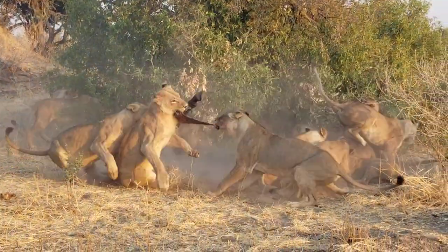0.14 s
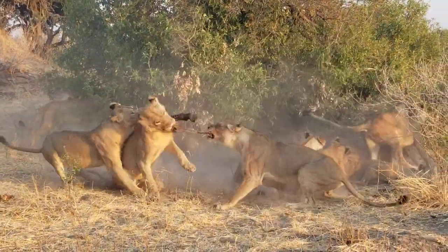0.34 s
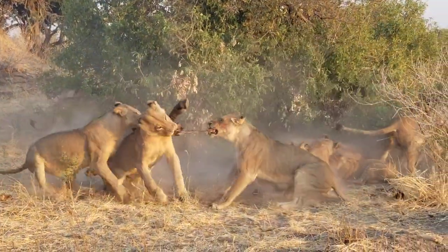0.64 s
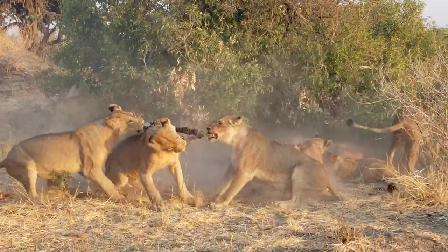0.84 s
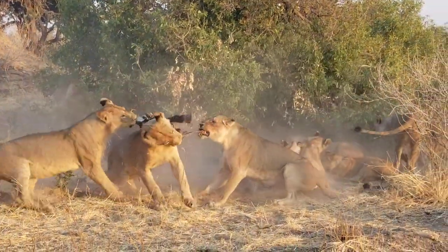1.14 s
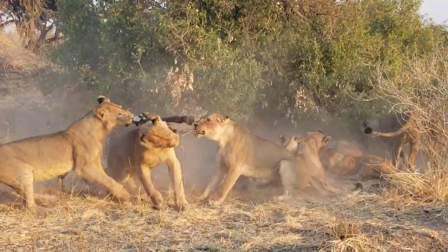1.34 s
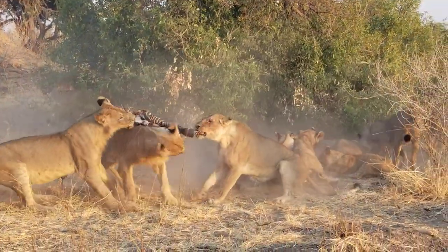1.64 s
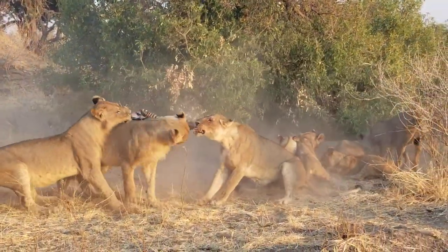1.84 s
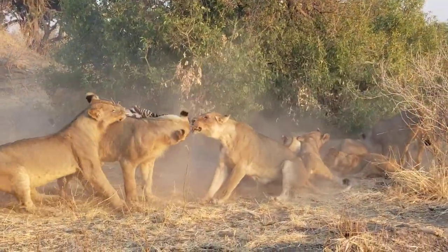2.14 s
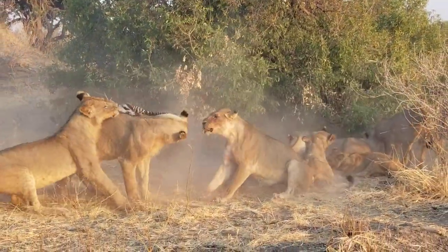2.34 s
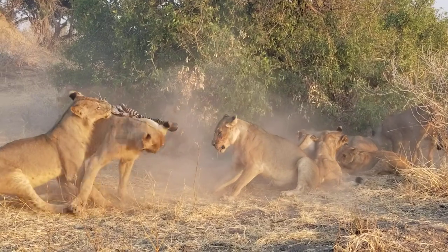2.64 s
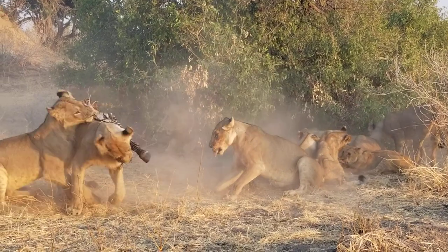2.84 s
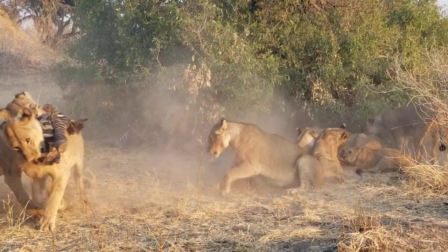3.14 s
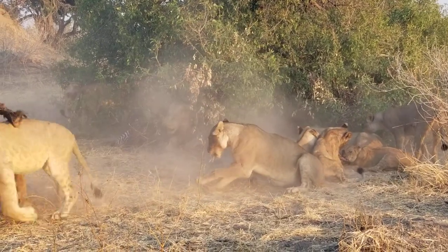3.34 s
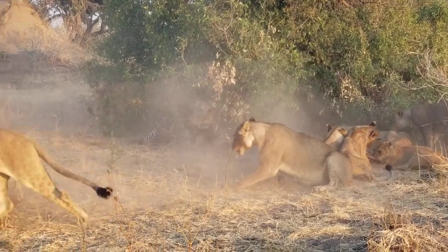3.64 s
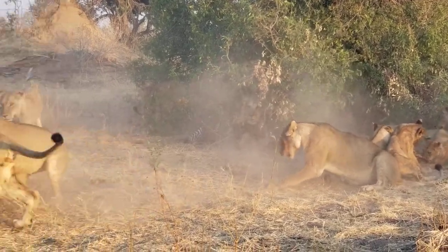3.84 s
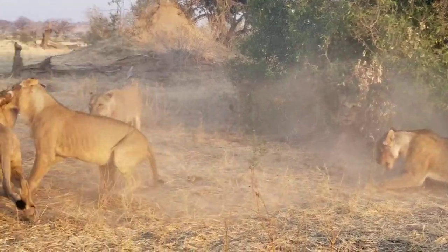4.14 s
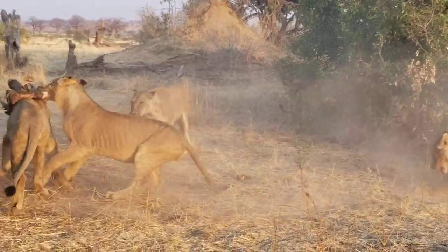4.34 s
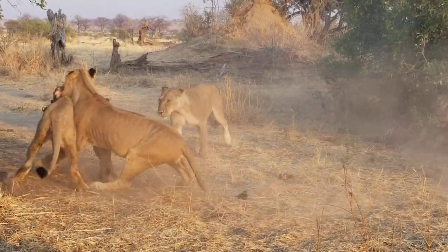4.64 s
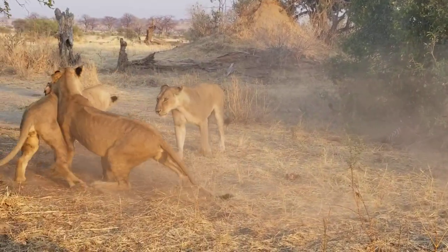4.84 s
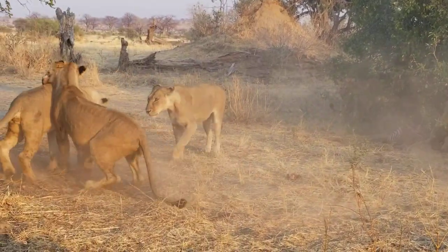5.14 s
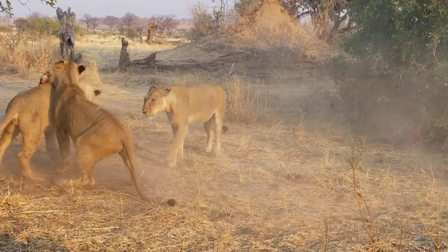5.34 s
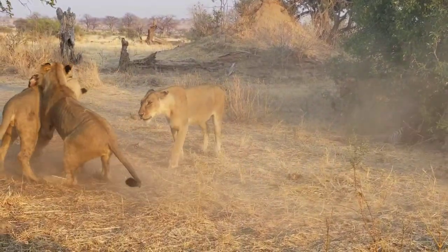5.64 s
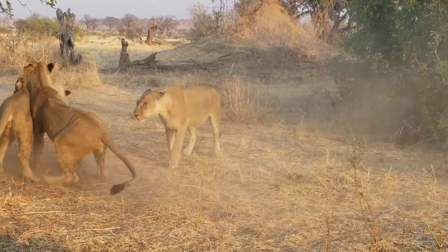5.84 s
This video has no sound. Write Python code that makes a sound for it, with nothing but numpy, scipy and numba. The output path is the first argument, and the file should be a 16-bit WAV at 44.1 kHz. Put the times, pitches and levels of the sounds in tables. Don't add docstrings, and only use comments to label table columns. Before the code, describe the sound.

Lions growl and snarl in deep, rattling pulses over a kill, with dry grass rustling and camera shutters clicking close by.

```python
import sys
import numpy as np
from scipy import signal
from scipy.fft import next_fast_len
from scipy.io import wavfile
from scipy.ndimage import uniform_filter1d
from numba import njit

SR = 44100
rng = np.random.default_rng(int(sys.argv[2]) if len(sys.argv) > 2 else 0)


def dump_mix(stems):
    frames = np.atleast_2d(stems).T
    limited = np.clip(frames, -1, 1)
    pcm = np.round(limited * 32767).astype(np.int16)
    wavfile.write(sys.argv[1], SR, pcm)


def invert_db(level):
    return 10 ** (np.asarray(level, dtype=float) / 20)


N = 264159


def rms_one(x):
    return x / np.sqrt(np.mean(x ** 2) + 1e-20)


def in_time(rows):
    s, *columns = np.transpose(rows)
    return [np.interp(np.arange(N) / SR, s, c) for c in columns]


def at_hz(points, hz):
    points_hz, db = np.transpose(points)
    return np.interp(np.log(hz), np.log(points_hz), db)


def drift(rate_hz):
    r = np.exp(-80 * np.pi * rate_hz / SR)
    white = rng.standard_normal(N // 40 + 2002)
    slow = signal.lfilter([1], [1, -2 * r, r * r], white)[2000:]
    return np.interp(np.arange(N) / 40, np.arange(len(slow)), rms_one(slow))


def cut(x, hz, kind, order=2):
    return signal.sosfilt(signal.butter(order, hz, kind, fs=SR, output="sos"), x)


def steep_low(x, edge_hz):
    return signal.sosfilt(signal.cheby2(12, 60, edge_hz, fs=SR, output="sos"), x)


def fade(x, seconds):
    decay = np.exp(-1 / (max(seconds, 1e-4) * SR))
    return signal.lfilter([1], [1, -decay], x + 1e-18)


def early(x, seconds):
    return np.interp(np.arange(N) + seconds * SR, np.arange(N), x)


@njit
def resonate(x, turn, r):
    y = np.zeros(len(x))
    for i in range(2, len(x)):
        drive = (1 - r[i] ** 2) / 2 * (x[i] - x[i - 2])
        y[i] = drive + 2 * r[i] * np.cos(turn[i]) * y[i - 1] - r[i] ** 2 * y[i - 2]
    return y


def cavities(x, modes, sign=-1):
    out = 0
    for k, (hz, width_hz, db) in enumerate(modes):
        turn = 2 * np.pi * hz / SR * np.ones(N)
        radius = np.exp(-np.pi * width_hz / SR) * np.ones(N)
        out = out + sign ** k * invert_db(db) * resonate(x, turn, radius)
    return out


def evened(x, seconds=0.12):
    size = int(seconds * SR)
    power = uniform_filter1d(uniform_filter1d(x ** 2, size=size), size=size // 2)
    return x / np.sqrt(power + 1e-12)


ATTACK_DB_PER_S, RELEASE_DB_PER_S = 305, 241


def swells(start, end, first_db, last_db, *traits, floor_db, rise=ATTACK_DB_PER_S, fall=RELEASE_DB_PER_S):
    t = np.arange(0, N + 128, 128)[:, None] / SR
    progress = np.clip((t - start) / np.maximum(end - start, 1e-3), 0, 1)
    hold_db = first_db + (last_db - first_db) * progress
    skirts_db = rise * np.maximum(start - t, 0) + fall * np.maximum(t - end, 0)
    power = invert_db(hold_db - skirts_db) ** 2 + 1e-200
    total = power.sum(axis=1)
    level_db = 10 * np.log10(total + invert_db(floor_db) ** 2)
    return in_time(np.transpose([t[:, 0], level_db] + [power @ c / total for c in traits]))


PORTS_SHARE = .5


def ports(pair, share=PORTS_SHARE):
    turned = np.imag(signal.hilbert(pair[0], next_fast_len(N)))[:N]
    share = np.clip(share, 0, 1)
    return np.array([pair[0], share * turned + np.sqrt(1 - share ** 2) * pair[1]])


# frequency in Hz, side against mid in dB.
WIDTH = [(60, 36), (110, 17), (200, 16), (380, 11), (700, -3), (1290, 2), (2380, -2), (4400, 1.5),
         (8120, -0.5), (15000, 1)]


def banded_noise(spectrum, patchy_db):
    out, together = 0, drift(25)
    edges = 30 * 2 ** np.arange(0, 9.6, .5)
    white = [ports(pair) for pair in rng.standard_normal((2, 2, N))]
    for k, (low, high) in enumerate(zip(edges, edges[1:])):
        hz = np.sqrt(low * high)
        if high > spectrum[0][0] and low < spectrum[-1][0]:
            mid, side = cut(white[k % 2], [low, high], "band")
            gain = invert_db(at_hz(spectrum, hz) + patchy_db * (1.1 * together + drift(27.0)))
            out = out + gain * (mid + invert_db(at_hz(WIDTH, hz)) * side * [[1], [-1]])
    return rms_one(out)


def panned(events):
    clicks = np.zeros((2, N))
    for s, peak_db, pan_db, *rest in events:
        clicks[:, int(s * SR)] = invert_db(peak_db + np.array([pan_db, -pan_db]) / 2)
    return clicks


# start in seconds, end in seconds, pulses per second at start,
# pulses per second at end, roughness 0-1.
PHRASES = [(.005, .17, 45, 50, .6), (.19, .32, 36, 40, .6), (.324, .51, 36, 31, .3),
           (.52, .64, 39, 35.5, .2), (.655, .83, 32, 33.5, .12), (.836, 1.09, 36.5, 31, .13),
           (1.113, 1.35, 27, 30, .25), (1.38, 1.76, 32, 30, .6), (1.772, 2.1, 21.3, 23, .15),
           (2.17, 2.3, 30, 30, .7), (2.316, 2.5, 32, 32, .4), (2.522, 2.94, 25.5, 17.5, .17),
           (3.012, 3.19, 32, 35, .2), (3.21, 3.32, 40, 40, .7), (3.328, 3.46, 45, 46, .13),
           (3.475, 3.6, 44, 44, .5), (3.607, 3.88, 33, 34, .15), (3.895, 4.26, 32, 30.5, .15),
           (4.271, 4.68, 21, 15, .65), (4.702, 4.88, 46, 28, .3), (4.891, 5.24, 31, 30, .4),
           (5.26, 5.54, 30, 30, .7), (5.552, 5.75, 32, 32, .4), (5.772, 5.99, 31, 34, .2)]
LIMPING_PHRASE_S, LIMP_DB = 1.113, 8.5


def folds(slip_s=.005, spread_db=6.0):
    pulses, rough = np.zeros(N), np.zeros(N)
    for start, end, first, last, roughness in PHRASES:
        chance, s = rng.standard_normal((30, 2)), start
        rough[int(start * SR):] = np.clip(roughness, 0, 1)
        for k, (slip, size) in enumerate(chance):
            if s < end:
                at = int((s + slip * slip_s * roughness * (k > 0)) * SR)
                limp_db = LIMP_DB * (start == LIMPING_PHRASE_S and k % 2 == 0)
                pulses[min(at, N - 1)] = invert_db(spread_db * roughness * size - limp_db)
            s += 1 / np.interp(s, [start, end], [first, last])
    return pulses, rough


def voiced(pulses, rough, puff_s, turbulence=1):
    puffs = rms_one(fade(np.abs(pulses), puff_s) * rng.standard_normal(N))
    return (1 - rough) * rms_one(pulses) + turbulence * rough * puffs


SLOW_PER_S, FAST_PER_S, FAST_DAMPING = 29, 33, 1.6
LIMP_RING = .65


def damping():
    start, end, first, last, rough = np.transpose(PHRASES)
    running = np.clip(np.searchsorted(start * SR, np.arange(N)) - 1, 0, None)
    factor = np.interp((first + last) / 2, [SLOW_PER_S, FAST_PER_S], [1, FAST_DAMPING])
    return np.where(start == LIMPING_PHRASE_S, LIMP_RING, factor)[running]


# full from seconds, held until seconds, chest level at start in dB,
# at end in dB, raised larynx as low throat against chest in dB.
RUMBLES = [(0, 0.12, -25, -42, -2), (0.235, 0.356, -35.5, -45, 2.5), (0.38, 0.493, -30.5, -26.5, 0),
           (0.52, 0.727, -28.5, -27, 0), (0.766, 1.068, -33.5, -34, -2.5), (1.113, 1.34, -25.5, -31, -6.5),
           (1.413, 1.642, -43.5, -48, 3), (1.791, 2.03, -35.5, -33, -14.5), (2.17, 2.24, -61, -43.5, -6.5),
           (2.327, 2.44, -29.5, -40, -7.5), (2.503, 2.742, -31, -34, -4), (2.8, 2.887, -39.5, -44.5, 3.5),
           (3.029, 3.07, -38.5, -37, 5.5), (3.107, 3.162, -42, -47.5, 2), (3.387, 3.458, -30.5, -30.5, 3),
           (3.47, 3.571, -41, -30, -0.5), (3.595, 3.931, -26, -32.5, -1.5), (3.958, 4.03, -43, -44.5, 18),
           (4.023, 4.169, -34, -33.5, -2), (4.243, 4.575, -40.5, -53.5, -1.5),
           (4.746, 4.784, -33.5, -28, -3), (4.823, 5.177, -35.5, -42.5, -4), (5.38, 5.5, -48.5, -63, 1.5),
           (5.584, 5.647, -41, -44, -3.5), (5.789, 5.987, -33.5, -38, -8.5)]
# full from seconds, held until seconds, throat level in dB, throat ring in Hz,
# jaw opening 0-1.
SNARLS = [(0, 0.093, -36, 303, 0.41), (0.17, 0.257, -58, 312, 0.56), (0.314, 0.39, -49.5, 296, 0.6),
          (0.399, 0.466, -37.5, 452, 0.52), (0.515, 0.615, -42.5, 444, 0.8), (0.605, 0.628, -35, 335, 0.64),
          (0.654, 0.685, -40, 388, 0.54), (0.693, 0.774, -34, 363, 0.33), (0.82, 0.962, -37, 403, 0.24),
          (0.96, 1.085, -41, 380, 0.39), (1.105, 1.135, -35.5, 384, 0.47),
          (1.159, 1.188, -28.5, 425.6, 0.33), (1.202, 1.275, -31.5, 412, 0.25),
          (1.301, 1.339, -32.5, 399, 0.26), (1.412, 1.8, -49.5, 318, 0.1), (1.834, 1.9, -55.5, 410, 0),
          (1.97, 2.041, -44, 345, 0.3), (2.294, 2.405, -50, 505, 0.59), (2.44, 2.502, -51, 474, 0.47),
          (2.52, 2.567, -49, 362, 0.4), (2.603, 2.708, -46.5, 351, 0.3), (2.718, 2.796, -44, 326, 0.21),
          (2.797, 2.848, -46.5, 360, 0.23), (2.886, 2.9, -58, 292, 0.2), (3.015, 3.045, -54.5, 303, 0),
          (3.04, 3.09, -51.5, 298, 0.39), (3.092, 3.205, -52, 310, 0.25), (3.36, 3.398, -47.5, 322, 0.54),
          (3.402, 3.444, -44, 515, 0.55), (3.458, 3.57, -46, 362, 0.42), (3.613, 3.636, -36.5, 416, 0.43),
          (3.714, 3.79, -41.5, 393, 0.35), (3.85, 3.862, -51, 392, 0.6), (3.916, 3.988, -44, 318, 0.22),
          (4.025, 4.237, -45.5, 360, 0.43), (4.36, 4.71, -53, 293, 0.44), (4.729, 4.895, -45.5, 296, 0.45),
          (4.916, 5.19, -48.5, 256, 0.4), (5.37, 5.562, -62, 398, 0.48), (5.573, 5.666, -54, 512, 0.2),
          (5.78, 5.906, -53.5, 324, 0.42), (5.95, 5.99, -50, 320, 0.37)]
# time in seconds, mouth ring in Hz.
LIPS = [(0, 820), (.32, 910), (.4, 902), (.45, 850), (.62, 854), (.75, 870), (1.03, 830), (1.16, 760),
        (1.3, 774), (2.05, 810), (2.33, 930), (2.6, 906), (3.4, 940), (3.6, 953), (3.85, 890), (4.05, 673),
        (4.76, 918), (5.99, 830)]
# time in seconds, share of the ring behind the teeth in dB.
TONGUE = [(.1, -12), (.4, -14.5), (.5, -3.5), (1.0, -29), (1.1, -10), (2.1, -30), (2.3, 1), (2.55, 1),
          (3.05, -51), (3.44, -2), (3.75, -25), (4.2, -1), (4.3, -11), (4.6, -10), (4.9, 4), (5.2, -16)]
SNARL_ATTACK_DB_PER_S, SNARL_RELEASE_DB_PER_S, SNARL_SAG_DB_PER_S = 487, 361, 37.5
FAR_RUMBLE_DB, FAR_SNARL_DB = -67, -80.5
MOUTH_SHUT_DB, MOUTH_OPEN_DB = -32, 18
WANDER = .018


def posture():
    chest_db, low_db = swells(*np.transpose(RUMBLES), floor_db=FAR_RUMBLE_DB)
    start, end, db, hz, jaw = np.transpose(SNARLS)
    sagged_db = db - SNARL_SAG_DB_PER_S * (end - start)
    snarl_db, throat_hz, jaw = swells(start, end, db, sagged_db, hz, jaw, floor_db=FAR_SNARL_DB,
                                      rise=SNARL_ATTACK_DB_PER_S, fall=SNARL_RELEASE_DB_PER_S)
    throat_db = snarl_db - chest_db
    mouth_db = throat_db + MOUTH_SHUT_DB + (MOUTH_OPEN_DB - MOUTH_SHUT_DB) * jaw
    mouth_hz = in_time(LIPS)[0] * (1 + WANDER / 2 * drift(7.6))
    throat_hz = throat_hz * (1 + WANDER * drift(13.8))
    return chest_db, low_db, throat_db, mouth_db, throat_hz, mouth_hz, in_time(TONGUE)[0]


# centre in Hz, width in Hz, level in dB.
CHEST = [
    (56, 15, 1),
    (97, 14, 2),
]
# centre in Hz, width in Hz, level in dB.
LOW_THROAT = [(153.7, 28.9, 4.5), (167.9, 29.7, 5), (185.6, 12.1, 2), (225, 125, -16)]
# time in seconds, centre of the low throat rings in Hz.
LARYNX = [(0, 149.6), (.5, 153.5), (1.1, 155), (1.42, 176), (1.72, 179), (1.8, 154), (2.3, 155), (2.8, 157),
          (3.04, 176.4), (3.35, 163), (3.6, 161), (3.88, 158), (3.96, 177), (4.22, 180.3), (4.55, 178),
          (4.8, 149), (5.2, 160.4), (5.99, 150.4)]
# time in seconds, share of their ring in dB.
CHEEKS = [(.05, -4.5), (.4, -12.5), (.64, -15), (.7, -6.5), (.82, -12), (1.0, -14.5), (1.15, -37),
          (1.4, -5.5), (2.1, -49), (2.3, -5), (2.55, -16), (3.05, -46), (3.44, -9), (3.75, -16),
          (3.95, -18), (4.3, -8), (4.9, -4), (5.2, -24)]
# time in seconds, firmness 0-1.
FIRMNESS = [(0, 0.71), (.45, 0.58), (.63, 0.56), (1.0, 0.33), (1.12, 0.27), (1.4, 0.11), (1.8, 0.2),
            (2.3, 0.47), (2.9, 0.49), (3.2, 0.38), (3.55, 0), (3.62, 0.88), (3.9, 0.86), (4.12, 0.86),
            (4.3, 0.52), (4.8, 0.22), (5.3, 0.38), (5.99, 0.46)]
# full from seconds, held until seconds, extra deepest ring in dB.
HEAVY_CAT = [
    (0.757, 1.026, 17),
    (1.72, 1.825, 0),
    (2.3, 2.41, 6),
]
LARYNX_REST_HZ = 170
CHEST_LEAD_S, THROAT_LEAD_S = 0.00835, 0.004233
THUMP_HZ, THUMP_WIDTH_HZ, THUMP_DB, THUMP_LEAD_S = 151.2, 75.9, 1.5, .0015
FIRM_DAMPING, FIRM_CLEARS, FIRM_NECK_DB = 1.67, 0.33, -9.5
BELLY_FOLLOWS = 0.22


def growl(pulses, rough):
    chest_db, low_db, throat_db, mouth_db, throat_hz, mouth_hz, ring_db = posture()
    firm = np.clip(in_time(FIRMNESS)[0], 0, 1)
    damped = 1 + FIRM_DAMPING * firm
    clearing = np.clip(1 - FIRM_CLEARS * firm, 0, 1)
    leak = rough * clearing

    belly, ribs = CHEST
    start, end, extra_db = np.transpose(HEAVY_CAT)
    heavy_db, = swells(start, end, extra_db, extra_db, floor_db=0)
    body = [(belly[0], belly[1] * damped, belly[2] + BELLY_FOLLOWS * low_db + heavy_db),
            (ribs[0], ribs[1] * damped, ribs[2])]
    chest = cut(cavities(voiced(-pulses, leak, .025, 1.8), body, sign=1), [45, 125], "band")

    thump_mode = [(THUMP_HZ, THUMP_WIDTH_HZ, 0)]
    thump = cavities(cavities(pulses, thump_mode), thump_mode)

    lift = in_time(LARYNX)[0] / LARYNX_REST_HZ
    low_modes = [(hz * lift, width_hz * damped, db) for hz, width_hz, db in LOW_THROAT]
    low = cut(cavities(voiced(pulses, leak, .018, 1.1), low_modes), [128, 260], "band")

    wide = damping()
    tube = voiced(pulses, leak, 0.011) / np.sqrt(wide)
    for width_hz in (32, 120, 170):
        tube = cavities(tube, [(throat_hz, width_hz * wide, 0)])
    muffled = np.clip(rough - (mouth_db + 14) / 24, rough, .9) * clearing
    neck_modes = [(302.5, 32.3 * damped, -0.5 + FIRM_NECK_DB * firm), (544, 224, in_time(CHEEKS)[0])]
    neck = cut(cavities(voiced(pulses, muffled, 0.089), neck_modes), [250, 680], "band")
    throat = tube + neck

    mouth_modes = [(mouth_hz * 0.802, 60, -3), (mouth_hz, 60, 0), (1060, 200, -22), (1210, 35, ring_db)]
    mouth = cut(cavities(voiced(pulses, muffled, 0.03), mouth_modes), [560, 1400], "band")

    mix = early(evened(chest), CHEST_LEAD_S)
    mix = mix + firm * invert_db(THUMP_DB) * early(evened(thump), THUMP_LEAD_S)
    mix = mix + invert_db(low_db) * early(evened(low), THROAT_LEAD_S)
    mix = mix + invert_db(throat_db) * early(evened(throat), THROAT_LEAD_S)
    mix = mix + invert_db(mouth_db) * evened(mouth)
    return invert_db(chest_db) * mix


# full from seconds, held until seconds, level at start in dB, at end in dB,
# bared teeth as bright against dull part in dB.
HISSES = [(0, 0.182, -54.5, -54, 1), (0.213, 0.46, -62.5, -54, 0.5), (0.494, 0.649, -52.5, -53, 3),
          (0.678, 1.03, -50, -56, -9), (1.128, 1.337, -55.5, -57, 3), (1.41, 1.683, -62.5, -69, -6),
          (1.997, 2.075, -57, -66, -1), (2.302, 2.668, -56, -55, -3), (2.801, 2.86, -54.5, -62, -13),
          (3.058, 3.157, -63, -67.5, -17), (3.29, 3.424, -61, -56, -14), (3.43, 3.466, -44.5, -46, -1),
          (3.503, 3.54, -51, -49, -6), (3.54, 4.21, -51.5, -63, -12.5), (4.27, 4.283, -52, -59, -12),
          (4.354, 4.7, -60.5, -74, -10), (4.753, 4.9, -52, -46, -29), (4.969, 5.1, -51.5, -79, -15),
          (5.825, 5.88, -45.5, -59, -16), (5.903, 5.99, -61, -60, -6)]
# time in seconds, share.
STEADY_BREATH = [(0, .1), (.35, .03), (.7, 0.041), (1.0, 0.3), (1.4, 0.054), (2.2, 0.075), (2.3, 0.76),
                 (2.55, 0.85), (2.62, 0.055), (3.3, 0.07), (3.55, .08), (3.7, 0.025), (4.7, .05),
                 (4.8, 0.15), (5.7, .1), (5.8, 0.55), (5.99, .6)]
# centre in Hz, width in Hz, level in dB.
TEETH = [(2532, 26, 7), (2803, 150, 7), (3146, 174, 6), (3650, 400, 1)]
# centre in Hz, width in Hz, level in dB.
PALATE = [(1046, 153, 7.5), (1365, 155, 6.5), (1607, 67, 8), (1943, 250, 2.5), (2445, 130, 1.5),
          (3240, 105, -3.5)]
FAR_HISS_DB = -106


def rasp(pulses, rough):
    dull_db, bared_db = swells(*np.transpose(HISSES), floor_db=FAR_HISS_DB, rise=SNARL_ATTACK_DB_PER_S)
    bright_db = dull_db + bared_db
    steady = np.clip(in_time(STEADY_BREATH)[0], 0, 2)
    throb = .04 + 2 * rough ** 2 + fade(pulses, .014) + steady
    spurt = .05 + rough ** 2 * 1.3 + fade(pulses, .01) + steady
    sides = []
    for air in ports(rng.standard_normal((2, N)), share=PORTS_SHARE + 0.11):
        bright = cut(cavities(spurt * air, TEETH), [2100, 4300], "band")
        dull = cut(cavities(throb * air, PALATE), 3500, "low", order=4)
        sides.append(invert_db(bright_db) * evened(bright) + invert_db(dull_db) * evened(dull))
    mid, side = sides
    flutter_db = 1.5 * drift(9.5)
    return invert_db(-5.5 + flutter_db) * (mid + invert_db(-1.0) * side * [[1], [-1]])


# delay in seconds, left level in dB, right level in dB.
ECHOES = [
    (.0042, -50, -40.5),
    (0.009, -31, -12),
    (.047, -13.5, -13.5),
    (.083, -21, -29),
]


def outdoors(x):
    out, dull = x * invert_db([[.7], [-.7]]), cut(x, 3300, "low")
    for s, left_db, right_db in ECHOES:
        lag = int(s * SR)
        out[:, lag:] += invert_db([[left_db], [right_db]]) * dull[:-lag]
    return out


# frequency in Hz, density in dB.
BUSH = [(18, -31), (30, 0), (138, 2), (582, 13.5), (1130, 9), (1660, 7), (1820, -39), (2400, -52),
        (3300, -6.5), (7000, 8.5), (9100, -17), (15400, -120)]


def bush():
    return invert_db(-61) * banded_noise(BUSH, patchy_db=3)


# time in seconds, level in dB.
SCUFFLE = [(0, -50.5), (.3, -46), (.95, -45.5), (1.05, -56), (1.55, -54), (2.1, -51.5), (3.9, -53),
           (4.3, -50), (4.65, -51), (4.8, -53.5), (5.35, -55), (5.99, -58)]
# time in seconds, peak in dB.
SWEEPS = [(0.096, -36.5), (.85, -45), (.98, -46.5), (1.217, -43), (1.865, -54), (2.53, -52.5),
          (2.755, -45.5), (2.88, -56), (3.03, -78), (3.265, -49), (3.3, -46.5), (3.49, -45), (3.77, -47.5),
          (4.13, -42), (4.5, -65), (4.83, -55), (5.0, -53), (5.1, -52), (5.2, -60.5)]


def rustle_db():
    s, db = np.transpose(SWEEPS)
    sweeps_db, = swells(s, s, db, db, floor_db=-66, rise=202, fall=77)
    return 10 * np.log10(invert_db(sweeps_db) ** 2 + invert_db(in_time(SCUFFLE)[0]) ** 2)


# frequency in Hz, density in dB per Hz.
GRASS = [(1470, -21), (2500, 3), (3180, 1.5), (4760, 4), (6920, 1), (8080, 10.5), (9290, 7), (12300, 12.5),
         (15200, 15), (16000, -85)]


def grass(level_db):
    sizes = invert_db(3.9 * np.minimum(rng.exponential(1, (2, N)), 5)) * rng.choice([-1, 1], (2, N))
    rate_per_s = 2500 * invert_db(3 * drift(8))
    crackle = sizes * (rng.random((2, N)) < rate_per_s / SR)
    crackle = cut(cut(crackle, [8800, 14500], "band"), [9500, 14000], "band")
    hiss = banded_noise(GRASS, patchy_db=1.0)
    return steep_low(invert_db(level_db) * rms_one(hiss + 0.75 * rms_one(crackle)), 16050)


# start in seconds, peak in dB, L-R in dB, dull part against peak in dB,
# crack pitch in Hz.
SNAPS = [(0.0764, -36, 14, -3, 9000), (4.5907, -44, 14, -5, 8400), (5.7149, -53, 1, -20, 8500),
         (0.116, -26.5, 1, 3, 8800), (1.4988, -28, -1, -20, 13300), (1.51, -40, 5, 4, 12000),
         (1.992, -51, -1, 17.5, 12300), (3.037, -29, 2, -38, 12100), (3.2466, -32.5, 12.5, -46.5, 13000),
         (3.908, -30.5, 2, -30, 11800), (4.13, -57, 3, 20, 11700), (4.279, -32, 0, -12, 12600),
         (5.327, -40, 14, -36, 11700), (5.4015, -36, -1.0, 4, 12500), (5.558, -26, -6, -49, 12200), ]


def snaps():
    crack = fade(panned(SNAPS), 0.0021) * rng.standard_normal((2, N))
    starts, pitches = np.array(sorted(SNAPS))[:, [0, 4]].T
    hz = pitches[np.clip(np.searchsorted(starts, np.arange(N) / SR) - 1, 0, None)]
    dull_kicks = panned([(s, db + rel_db, pan_db) for s, db, pan_db, rel_db, _ in SNAPS])
    dull = fade(dull_kicks, 0.0012) * rng.standard_normal((2, N))
    pitched = np.array([cavities(cavities(c, [(hz, 5000, 0)]), [(hz, 5500, 0)]) for c in crack])
    return invert_db(4.0) * pitched + invert_db(-6.0) * cut(dull, [1500, 7000], "band")


# start in seconds, peak in dB, L-R in dB.
SHUTTERS = [
    (1.4132, -26, -3.5),
    (2.2892, -35.5, 4),
    (3.5518, -26, -0.5),
    (3.8621, -29, -1.5),
    (4.1505, -28, -2),
    (4.368, -28.5, -1),
    (5.3706, -27, 1),
    (5.8117, -28.5, 0.0),
]
# centre in Hz, width in Hz, level in dB.
SHUTTER_BLADES = [(4170, 760, -11.5), (6550, 1900, -15), (8860, 1140, -9.5), (12000, 2500, -6.5),
                  (15300, 1400, -18)]
# centre in Hz, width in Hz, level in dB.
SHUTTER_BODY = [(850, 460, -12), (1407, 90, -2), (1815, 53, 1), (2334, 185, -4), (3250, 610, -9.5)]


def shutters():
    kick, noise = panned(SHUTTERS), rng.standard_normal((2, N))
    rattle = fade(kick, 0.0079) - fade(kick, 0.00065) + invert_db(-13.0) * fade(kick, 0.012)
    knock = fade(kick, 0.014) - fade(kick, 0.001)
    blades = np.array([cavities(x, SHUTTER_BLADES) for x in noise * rattle])
    body = np.array([cavities(x, SHUTTER_BODY) for x in noise * knock])
    return invert_db(8.0) * blades + invert_db(5.0) * body


# start in seconds, peak in dB, pitch in Hz, t60 in seconds.
CHUFFS = [
    (2.632, -33.5, 823, 0.037),
    (3.158, -21, 176, 0.093),
    (4.267, -45, 573, 0.09),
    (4.505, -42, 580, 0.035),
    (5.115, -35, 330, 0.093),
    (5.639, -30, 440, 0.043),
]


def chuffs():
    out = np.zeros(N)
    for s, peak_db, hz, t60_s in CHUFFS:
        at = int(s * SR)
        t = np.arange(min(int(.15 * SR), N - at)) / SR
        level = invert_db(peak_db - 60 * t / t60_s) * (1 - np.exp(-t / 0.0015))
        out[at:at + len(t)] += level * np.sin(2 * np.pi * hz * t)
    return out


# time in seconds, level in dB.
WHEEZE = [
    (5.4, -63),
    (5.46, -53.5),
    (5.53, -63),
    (5.66, -60.5),
    (5.79, -67),
    (5.88, -68),
    (5.925, -55),
    (5.985, -71),
]
# time in seconds, level against lower in dB.
WHEEZE_UPPER = [
    (5.4, -28),
    (5.72, -28),
    (5.77, 1),
    (5.99, -3),
]


def wheeze():
    before, after = (WHEEZE[0][0] - .01, -110), (WHEEZE[-1][0] + .01, -110)
    level_db, = in_time([before] + WHEEZE + [after])
    upper_db, = in_time(WHEEZE_UPPER)
    air = []
    for n in rng.standard_normal((2, N)):
        lower = cavities(cavities(n, [(1740, 140, 8), (2030, 57, 0)]), [(1850, 1300, 0)])
        upper = cavities(cavities(n, [(3220, 120, upper_db)]), [(3220, 400, 3)])
        air.append(lower + upper)
    return invert_db(level_db - 2.6 + 0.61 * drift(30)) * rms_one(np.array(air))


def scene():
    pulses, rough = folds()
    cats = invert_db(-1.5) * (outdoors(growl(pulses, rough)) + chuffs()) + rasp(pulses, rough) + wheeze()
    return cats + bush() + grass(rustle_db()) + snaps() + shutters()


def roll_off(x):
    return signal.sosfilt(signal.butter(12, 16670, fs=SR, output="sos"), x)


def record(dry):
    mix = cut(steep_low(dry, 16650), 39.7, "high", order=4)
    return roll_off(mix)


dry = scene()
out = record(dry)
dump_mix(out)
```